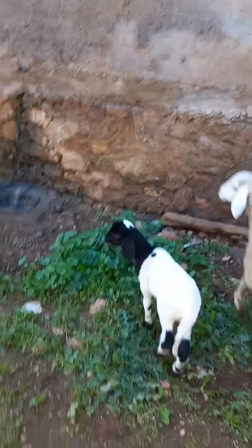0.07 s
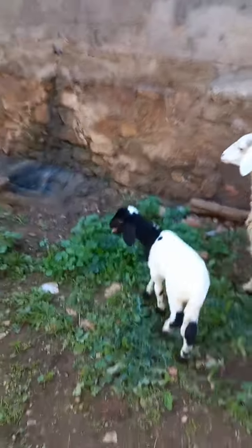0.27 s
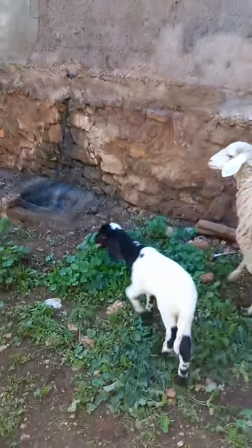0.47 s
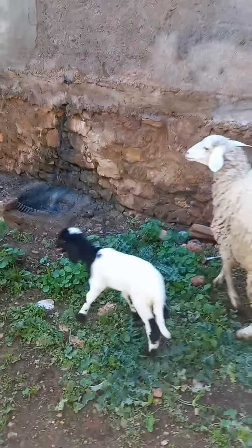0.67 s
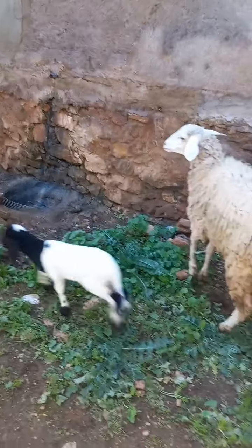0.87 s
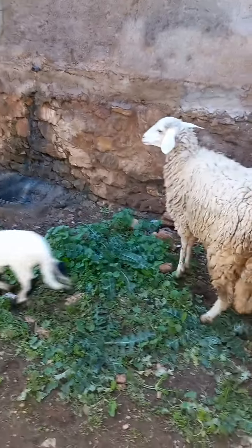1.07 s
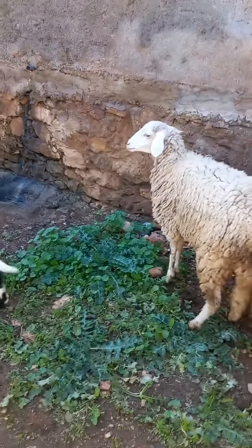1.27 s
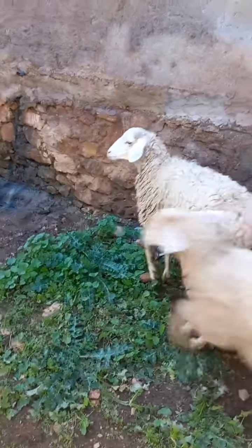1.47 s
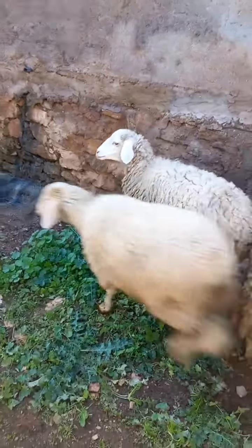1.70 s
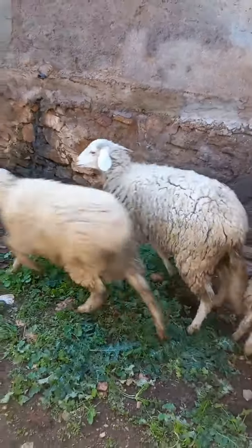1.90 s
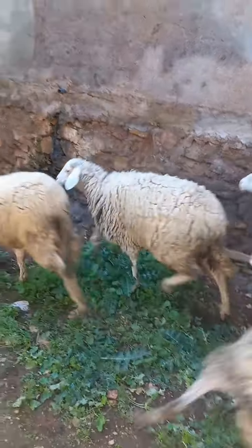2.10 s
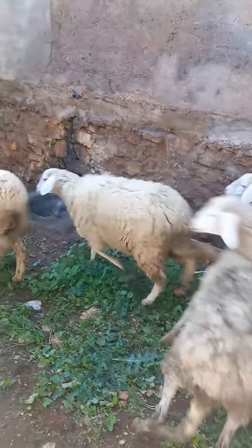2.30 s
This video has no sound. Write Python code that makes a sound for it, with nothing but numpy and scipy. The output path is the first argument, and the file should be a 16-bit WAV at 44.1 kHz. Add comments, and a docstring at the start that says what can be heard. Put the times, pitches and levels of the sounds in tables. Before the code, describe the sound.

One trembling bleat from a lamb, followed by faint hoof thuds and rustling leaves.

```python
"""A lamb gives one quavering bleat, a run of quick throbs, in a small yard whose stone wall throws it back.
Its vocal pulses and breath ring the throat and mouth; soft hisses come just before and after the bleat.
Sheep trot past over weeds and stony earth: hooves thud, leaves swish and grit clicks.
Heard from a few metres away on a phone's two microphones, over a low outdoor rumble."""
import sys
import numpy as np
from scipy import signal
from scipy.fft import rfft, irfft
from scipy.io import wavfile
from scipy.ndimage import map_coordinates

SR = 44100
rng = np.random.default_rng(int(sys.argv[2]) if len(sys.argv) > 2 else 0)


def pcm_store(signal):
    """Save signal as 16-bit PCM."""
    levels = np.round(np.clip(np.atleast_2d(signal), -1, 1) * 32767)
    wavfile.write(sys.argv[1], SR, levels.astype(np.int16).T)


N = 108045
FFT_SIZE, TOP_HZ = 2 ** 17, 15850
FLOCK_LAG_S = -.00022  # the steps reach the right microphone first


def undb(db):
    """Decibels to gain."""
    return 10 ** (np.asarray(db) / 20)


def unit(x):
    """Scale to rms 1."""
    return x / np.sqrt(np.mean(x ** 2) + 1e-20)


def colour(x, points):
    """Causal filter through (f/Hz, level/dB) points."""
    hz, db = np.array(points, float).T
    freqs = np.maximum(np.fft.rfftfreq(FFT_SIZE, 1 / SR), 1)
    cepstrum = irfft(np.log(undb(np.interp(np.log(freqs), np.log(hz), db))))
    cepstrum[1:FFT_SIZE // 2] *= 2  # fold to minimum phase
    cepstrum[FFT_SIZE // 2 + 1:] = 0
    return irfft(rfft(x, FFT_SIZE) * np.exp(rfft(cepstrum)), FFT_SIZE)[..., :N]


def lowpass(x, hz, order=2):
    """Low-pass without delay."""
    return signal.sosfiltfilt(signal.butter(order, hz, fs=SR, output="sos"), x)


def flutter(hz):
    """Random wavering slower than hz, at rms 1."""
    return unit(lowpass(rng.standard_normal(2 * N), hz)[N // 2:N // 2 + N])


def late(x, seconds):
    """Delay a sound."""
    return map_coordinates(x, [np.arange(N) - seconds * SR], order=3)


def mic_pair(x, lag_s):
    """One sound at the two microphones, lag_s later on the right."""
    return np.array([x, late(x, lag_s)])


def burst(t, rise_s, decay_s):
    """Smooth rise to a peak at t = 0, then exponential decay."""
    return np.exp(-(np.minimum(t, 0) / rise_s) ** 2 - np.maximum(t, 0) / decay_s)


def air():
    """Outdoor rumble, alike at both microphones, under a wide faint hiss."""
    # spectrum of the open air: f/Hz, relative level/dB
    spectrum = [(25, -41), (45, -37), (65, -3.5), (82, 4), (105, 0.5), (135, -1), (163, 4.5), (195, -6.5),
                (280, -6.5), (550, -21), (1200, -20), (2000, -20.5), (2600, -29), (5000, -23.5),
                (7900, -27), (9500, -34.5), (13500, -32.5), (15500, -37)]
    mid, side = colour(rng.standard_normal((2, N)), spectrum)
    side = side - 0.91 * lowpass(side, hz=900, order=1)
    swell = undb(0.13 * flutter(hz=24))
    return undb(-52.5) * swell * (mid + np.array([side, -side])) / np.std(mid)


def yard(x, t60_s=0.21, build_s=0.0019):
    """Diffuse ring of the walled yard; the treble dies sooner."""
    t = np.arange(N // 3) / SR
    noise = rng.standard_normal((2, len(t)))
    low = lowpass(noise, hz=6300)
    treble = (noise - low) * np.exp(-t / 0.035)
    fade = np.exp(-np.log(1000) * t / t60_s)
    tail = (low + treble) * fade * (1 - np.exp(-(t / build_s) ** 2))
    tail /= np.sqrt(np.sum(tail ** 2, axis=1, keepdims=True))
    return signal.fftconvolve(x[None], tail, axes=1)[:, :N]


def stones(x, spread_s=0.001116, grain_hz=443.5, mic_spread_rad=.6):
    """Rough stone and ground nearby delay each frequency a little differently at each microphone."""
    freqs = np.fft.rfftfreq(FFT_SIZE, 1 / SR)
    knots = rng.standard_normal((200, 3)).T
    delay, left, right = (np.interp(freqs / grain_hz, np.arange(len(k)), k) for k in knots)
    turn = 2 * np.pi * np.cumsum(spread_s * delay) * freqs[1] + mic_spread_rad * np.array([left, right])
    return irfft(rfft(x, FFT_SIZE) * np.exp(-1j * turn), FFT_SIZE)[:, :N]


def wall_echo(x):
    """The stone wall throws back one quick echo, coloured by its hollows."""
    # response of the hollows: f/Hz, level/dB
    hollows = [(300, 2.5), (1180, -5), (1420, 8.5), (1700, 2), (3000, 3), (4500, -6), (8000, 5), (16000, 3)]
    echo = late(colour(x, hollows), seconds=.0232)
    return undb(-8.5) * stones(mic_pair(echo, lag_s=-0.00021))


def hooves(t, rise_s=0.0064, decay_s=0.046):
    """Dull thuds of soft earth under the hooves."""
    # hooves landing: t/s, level/dB
    thuds = [(0.072, -45), (.13, -52), (0.221, -46.5), (0.28, -47), (0.638, -45.5), (0.789, -50.5),
             (0.982, -53.5), (1.047, -50.5), (1.19, -52.5), (1.314, -46.5), (1.561, -45.5), (1.862, -49),
             (1.927, -45), (2.043, -51), (2.208, -44), (2.392, -52)]
    # spectrum of struck earth: f/Hz, relative level/dB
    earth = [(25, -47), (48, -17), (75, 1.5), (140, 0.5), (200, -5.5), (310, -3.5), (450, -12), (900, -18),
             (3000, -68)]
    weight = sum(undb(db) * burst(t - at - rise_s, rise_s, decay_s) for at, db in thuds)
    return weight * unit(colour(rng.standard_normal(N), earth))


def weeds_and_hisses(t, grains_per_s=5000, spread_db=1.5, crunch_db=2.5):
    """Tiny crackles swell into swishes of weeds, and into soft hisses just before and after the bleat."""
    # swishes and hisses: peak t/s, rise/s, decay/s, level/dB, treble lift and equal bass cut/dB
    # (the hisses, at 0.155 and 0.768 s, are perhaps the lamb's breath)
    swells = [(0.014, 0.041, 0.031, -48, -1.5), (.06, 0.02, 0.067, -46.5, -5),
              (.155, 0.016, 0.16, -59.5, 7), (0.768, 0.049, 0.043, -49, 0),
              (0.981, 0.047, 0.026, -48.5, 0.5), (1.06, 0.045, 0.039, -46.5, 0.5),
              (1.209, 0.043, 0.021, -47, 0), (1.376, 0.032, 0.021, -48, 0), (1.46, 0.017, 0.021, -56.5, 7),
              (1.562, 0.033, 0.13, -50, -1.5), (1.674, 0.0088, 0.023, -53, 4),
              (1.838, 0.015, 0.044, -49.5, -1), (1.933, 0.014, 0.075, -47, 4.5),
              (2.049, 0.024, 0.013, -53.5, -5.5), (2.17, 0.0028, 0.12, -51.5, 4),
              (2.302, 0.0057, 0.058, -50.5, -6), (2.38, 0.072, 0.077, -53.5, 4)]
    # spectrum of the crackle: f/Hz, relative level/dB
    spectrum = [(100, -5.5), (400, 0.5), (900, -3), (1900, 4.5), (2700, -3.5), (4600, -0.5), (6500, -5),
                (8000, 1), (8800, -13), (10500, -13.5), (13000, -11.5), (16000, -18)]
    grains = (rng.random((3, N)) < grains_per_s / SR) * rng.standard_normal((3, N))
    grains *= undb(spread_db * rng.exponential(size=(3, N)))
    crackle = unit(colour(mic_pair(grains[0], FLOCK_LAG_S) + 2.5 * grains[1:], spectrum))
    crackle = unit(crackle * undb(crunch_db * flutter(hz=67)))  # stems give way in uneven bunches
    dull = lowpass(crackle, hz=1900, order=1)
    bright = crackle - dull
    return sum(burst(t - at, rise, decay) * undb(db) * (dull * undb(-tilt) + bright * undb(tilt))
               for at, rise, decay, db, tilt in swells)


def grit_and_hiss(t, rise_s=0.00064):
    """Short dry cracks of grit, each with a broad ring, and a brief breathy hiss just before the bleat."""
    # cracks, and the hiss at 0.151 s: t/s, level/dB, centre f/Hz, decay/s, half width/octaves
    bursts = [(0.059, -41.5, 5360, 0.0045, 0.44), (0.0971, -26, 1480, 0.0014, 0.33),
              (0.151, -41, 5100, 0.027, 0.23), (0.797, -36, 1230, 0.0022, 1),
              (0.82, -35.5, 1892, 0.0023, 0.38), (.977, -35.5, 2670, 0.004, 0.39),
              (1.331, -48.5, 4320, 0.0077, .5), (1.557, -32.5, 4470, 0.0015, 0.84),
              (1.5597, -26, 5800, 0.0013, 0.53), (2.2125, -36.5, 4040, 0.002, 0.93),
              (2.381, -38, 4520, 0.0022, 0.3)]
    octave = np.log2(np.maximum(np.fft.rfftfreq(N, 1 / SR), 1))
    sound = np.zeros(N)
    for at, db, hz, decay, width in bursts:
        resonance = 1 / (1 + ((octave - np.log2(hz)) / width) ** 2)
        ring = unit(irfft(rfft(rng.standard_normal(N)) * resonance, N))
        sound += undb(db) * burst(t - at, rise_s, decay) * ring
    return sound


def direct_path(x):
    """The voice crosses the yard and meets the two microphones out of step."""
    # phase lead at the left microphone: f/Hz, lead/rad
    lead = [(0, -1), (1800, 1.56), (2200, 3), (4500, 6.5), (16000, 20)]
    turn = np.interp(np.fft.rfftfreq(FFT_SIZE, 1 / SR), *np.array(lead).T)
    right = irfft(rfft(x, FFT_SIZE) * np.exp(-1j * turn), FFT_SIZE)[:N]
    return np.array([x, right])


def breath(phase, effort, from_middle_s, growth_db_per_s=10):
    """Air puffs once per vocal cycle: a throat rasp, and a fine hiss that grows through the bleat."""
    # rasp of air in the throat: f/Hz, relative level/dB
    rasp_spectrum = [(200, -47), (500, -5.5), (900, -16), (1400, -0.5), (2000, 0), (2700, -16), (3300, -1),
                     (4500, 3.5), (5300, 3), (6200, 2), (7900, -3), (8600, -14.5), (13000, -24),
                     (16000, -38)]
    # fine hiss: f/Hz, relative level/dB
    hiss_spectrum = [(4000, -38), (8500, 1), (12500, 8), (16000, -21)]
    puffs = rng.standard_normal(N) * np.exp(-(phase % 1) / 0.77)
    rasp = unit(colour(puffs, rasp_spectrum)) * undb(-8.5 - 7.4 * (1 - effort))
    hiss_db = -26.5 + growth_db_per_s * from_middle_s - 4 * (1 - effort)
    return rasp, unit(colour(puffs, hiss_spectrum)) * undb(hiss_db)


def mouth(x, offset, centres_hz, strengths_db, width_hz=174, blend_s=0.033):
    """A sharp mouth resonance crossfades to a new frequency on each throb."""
    share = np.exp(-np.minimum((offset / blend_s) ** 2, 20))
    share /= share.sum(axis=0)
    rings = [undb(db) * signal.lfilter(*signal.iirpeak(hz, hz / width_hz, fs=SR), x)
             for hz, db in zip(centres_hz, strengths_db)]
    return x + np.sum(share * rings, axis=0)


def lamb(t):
    """Vocal pulses ring the throat; each throb lifts pitch and level, and the voice roughens between."""
    # throbs of the bleat: centre t/s, top pitch f/Hz, relative level/dB, half width/s,
    # low throat resonance lift/dB, mouth resonance f/Hz, its strength/dB
    throbs = [(.235, 279, -8.5, 0.011, -4.5, 4540, 5.5), (.260, 282.1, -7.5, .013, 0, 4650, 5.5),
              (0.335, 297.5, -2, 0.018, -1.5, 4660, 3.5), (0.425, 303, -1, 0.015, 1.5, 4770, 5.5),
              (.511, 303.6, -2, 0.018, -0.5, 4490, 9.5), (0.598, 300.2, -0.5, 0.018, -1, 4205, 0.5),
              (.680, 295.7, -4.5, 0.024, -1, 4800, -1)]
    # response of throat and mouth: f/Hz, relative level/dB
    throat = [(200, -24.5), (300, -15), (600, -16), (1030, -18), (1195, 0.5), (1290, 3.5), (1390, 1.5),
              (1500, -0.5), (1640, -13.5), (1800, -8), (2080, -6.5), (2230, -18), (2400, -6), (2750, -22),
              (3000, -3), (3300, -1.5), (3600, 1), (3750, -6), (4220, 0.5), (4510, -1.5), (4800, -3.5),
              (5400, -1), (5800, -9.5), (6600, -14), (7900, -15.5), (8500, -22), (10500, -39), (16000, -43)]
    start_s, end_s, attack_s, release_s = 0.196, 0.705, 0.025, 0.0073
    sag_hz, sag_width_s, slack_db = 43.67, .034, -14.5  # pitch and level drop between throbs
    jitter, slack_jitter, shimmer_db = .0045, .02, 1.2
    at, top_hz, db, width, low_db, mouth_hz, mouth_db = np.array(throbs).T
    offset = t - at[:, None]
    effort = np.exp(-(np.abs(offset) / width[:, None]) ** 2.45).max(axis=0)
    sag = 1 - np.exp(-(offset / sag_width_s) ** 2).max(axis=0)
    wobble, shimmer = (unit(lowpass(rng.standard_normal(N), hz=116)) for _ in range(2))
    pitch_hz = (np.interp(t, at, top_hz) - sag_hz * sag) * (1 + (jitter + slack_jitter * sag) * wobble)
    phase = np.cumsum(pitch_hz) / SR
    pulses = unit(sum(np.cos(2 * np.pi * k * phase) for k in range(1, int(TOP_HZ / top_hz.max()))))
    voice = unit(colour(pulses * undb(shimmer_db * shimmer), throat)) * undb(slack_db * (1 - effort))
    low_gain = undb(np.interp(t, at, low_db) - 4.2 * sag)
    voice += lowpass(voice, hz=2700, order=4) * (low_gain - 1)
    rasp, hiss = breath(phase, effort, t - at.mean())
    gate = np.clip((t - start_s) / attack_s, 0, 1) * np.clip((end_s - t) / release_s, 0, 1)
    level = gate * undb(-24.5 + np.interp(t, at, db))
    return level * (mouth(voice + rasp, offset, mouth_hz, mouth_db) + hiss)


def scene():
    """The lamb a few metres off, its wall echo, the passing flock and the open air."""
    t = np.arange(N) / SR
    bleat, bursts = lamb(t), grit_and_hiss(t)
    call = stones(direct_path(bleat)) + wall_echo(bleat)
    flock = mic_pair(bursts + hooves(t), FLOCK_LAG_S) + weeds_and_hisses(t)
    reverb = undb(-6.5) * yard(bleat + undb(-2.5) * bursts)
    return call + flock + reverb + air()


def record(dry):
    """The right microphone is shaded in the treble; the phone cuts the top."""
    # shading of the right microphone: f/Hz, level/dB
    shading = [(60, -2), (300, 0), (700, -5), (1500, 1), (2100, 1), (4400, -0.5), (6300, 0), (7300, -2),
               (8200, -22.5), (9500, -4.5), (12000, 1.5), (16000, 0)]
    heard = np.array([dry[0], colour(dry[1], shading)])
    return signal.sosfilt(signal.ellip(10, .2, 80, TOP_HZ, fs=SR, output="sos"), heard)


dry = scene()
out = record(dry)
pcm_store(out)
```